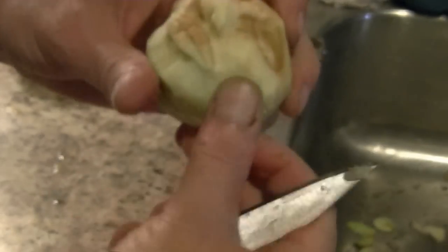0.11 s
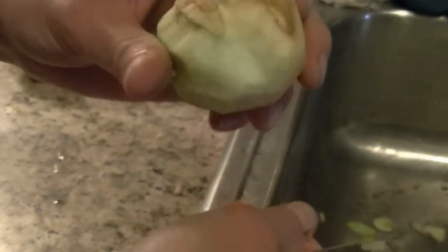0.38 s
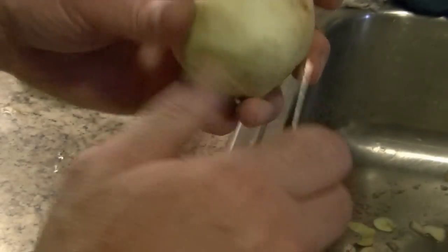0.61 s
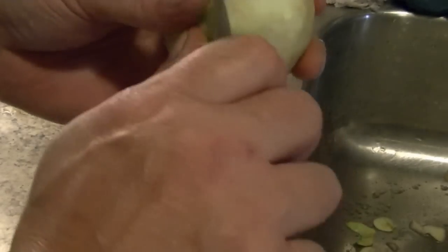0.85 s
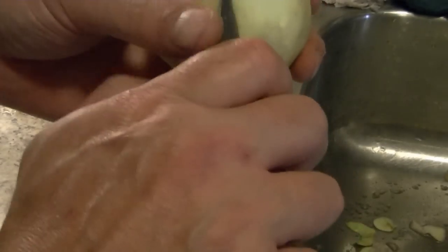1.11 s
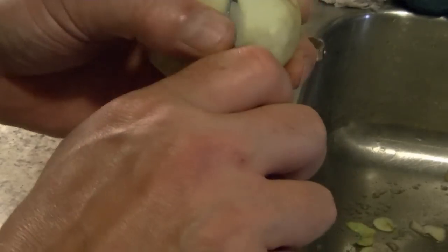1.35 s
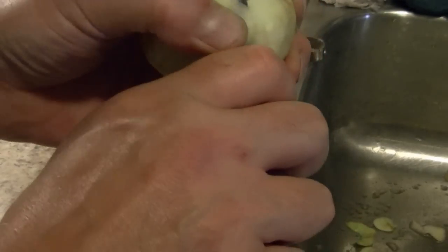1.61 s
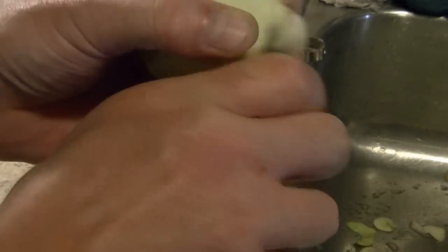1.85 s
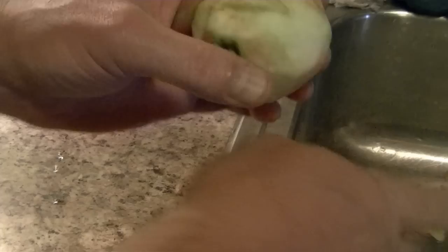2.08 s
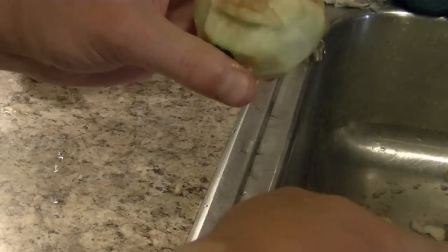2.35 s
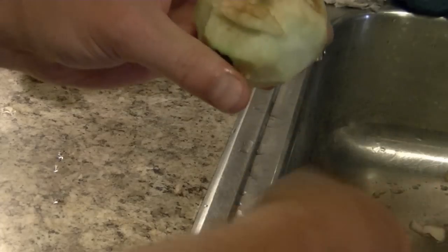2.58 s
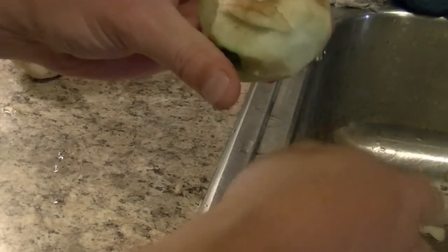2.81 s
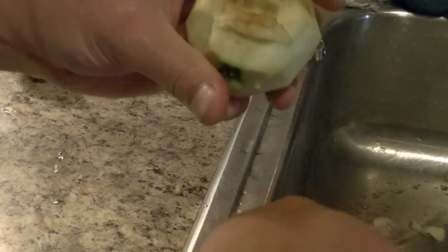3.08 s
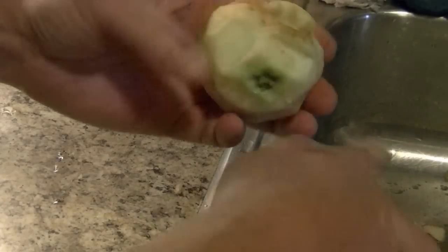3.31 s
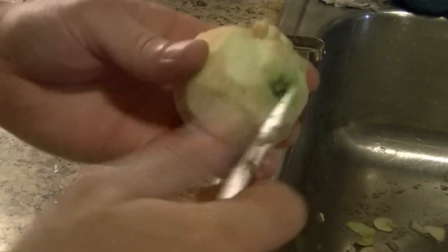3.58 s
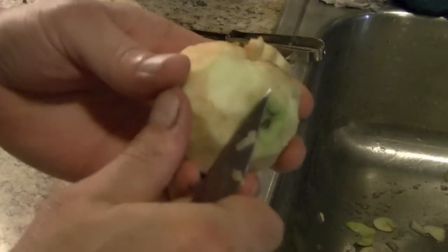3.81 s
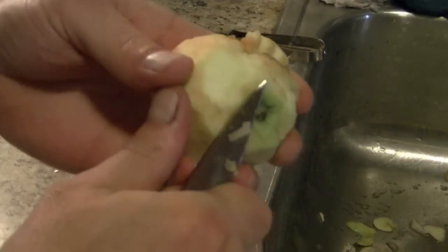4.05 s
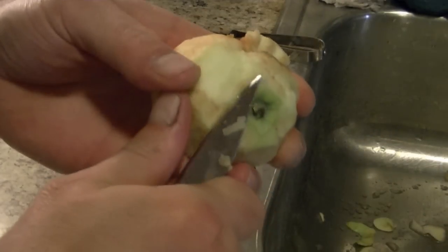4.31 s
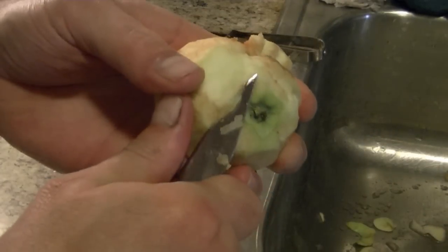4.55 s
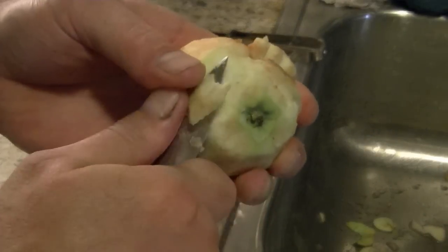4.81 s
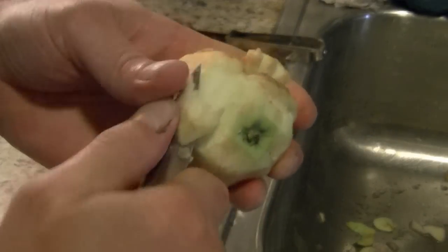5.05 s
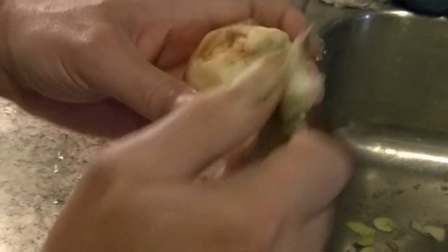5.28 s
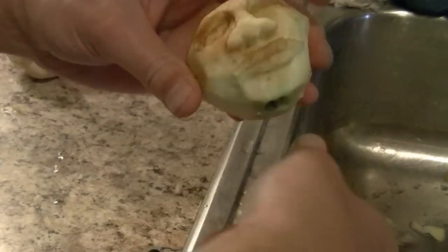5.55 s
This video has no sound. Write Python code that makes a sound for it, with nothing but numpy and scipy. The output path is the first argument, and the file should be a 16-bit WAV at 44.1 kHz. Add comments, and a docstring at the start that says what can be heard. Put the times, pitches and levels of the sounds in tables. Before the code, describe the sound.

A small knife cuts a wet peeled apple with crisp crackling crunches and one sharp snap, over a steady low kitchen hum.

```python
"""A small knife carves a peeled apple over a steel sink, close to a stereo camera in a humming kitchen.
From the start hum and microphone hiss (shaped noise) run on, fingers rub (patchy crackle), juice ticks (rung pushes).
Soon cells burst in swells of crackle that ring the fruit, and a wet squeak (narrow noise) slips by.
From about 1 s the blade rings too; at 2.7 s a scrap flicks off with a snap (damped tones) amid a soft hiss;
after 4 s come the hardest breaks, then rubbing and ticks to the end. The tiled room answers the hand sounds."""
import sys
import numpy as np
from scipy import signal
from scipy.fft import rfft, irfft
from scipy.io import wavfile
from scipy.ndimage import uniform_filter1d

SR = 44100
rng = np.random.default_rng(int(sys.argv[2]) if len(sys.argv) > 2 else 0)


def boost_factor(decibels):
    """Convert a level in decibels to a linear amplitude factor."""
    exponent = np.asarray(decibels, float) / 20
    return 10 ** exponent


def to_wav(s):
    """Save 16-bit WAV."""
    ch = np.atleast_2d(s).T  # columns
    pcm = np.round(np.clip(ch, -1, 1) * 32767)  # PCM
    wavfile.write(sys.argv[1], SR, pcm.astype(np.int16))


N = 249606  # length in samples

# Levels in the tables of hand sounds hold before the slight left-right balance in scene().

# colour of the appliance rumble and, in the treble, microphone hiss: (f/Hz, relative level per Hz/dB)
BACKGROUND_COLOUR = [(15, -60), (30, -64), (42, -56), (60, -26), (100, -15), (190, -9), (300, -9),
                     (480, -12), (800, -18), (1200, -20.5), (2400, -30), (4400, -37.5), (7000, -40),
                     (10600, -41.5), (13000, -51), (15000, -60)]
# narrow drones in the hum: (f/Hz, width/Hz, level before balance/dB)
HUM_DRONES = [(59.5, 2.5, -74.5), (149.6, 8.3, -65.5), (166, 14, -68), (189.2, 11.1, -53),
              (311.4, 25.5, -57), (408, 7.6, -61), (473.4, 9.9, -60.5), (670, 32, -64), (789, 3.6, -66.5),
              (955, 37, -63.5), (1322, 10, -70.5), (2826, 150, -70.5), (3850, 90, -76)]
# how alike the background is left and right: (f/Hz, likeness/share of 1, where below 0 counts as 0)
BACKGROUND_LIKENESS = [(30, -0.37), (60, 0.47), (130, 0.95), (290, 0.83), (630, 0.18), (1380, 0.11),
                       (3030, -0.79), (6640, -0.42), (14500, 0.16)]
# stretches of rubbing sound; the one from 2.626 s is only a soft, fading hiss around the snap:
# (start t/s, end t/s, hiss level at start/dB, hiss level at end/dB, fruit ring over hiss/dB)
RUB_STRETCHES = [(0, 0.21, -74, -72.5, 0), (0.24, 0.388, -61, -67, -4), (0.401, 0.42, -63, -63, -8),
                 (.5, 0.69, -82, -78, 0), (0.942, 1.012, -65.5, -65.5, 1), (1.084, 1.248, -64.5, -61, 1),
                 (1.287, 1.434, -55.5, -51.5, -3), (1.473, 1.656, -57, -53.5, -11),
                 (1.702, 1.814, -67, -60, -13), (1.87, 2.27, -64.5, -64.5, -4.5),
                 (2.343, 2.393, -65, -62, -22), (2.626, 2.8, -59, -78, 2.5), (2.92, 3.25, -65, -71, 2),
                 (3.283, 3.366, -66.5, -64, -6), (3.4, 3.488, -76, -66, -6),
                 (3.516, 3.687, -59, -59.5, -2.5), (3.757, 3.813, -69, -66.5, -13),
                 (3.937, 3.993, -63, -62.5, 5), (4.041, 4.237, -63.5, -61, 4.5),
                 (4.273, 4.393, -62.5, -60.5, 3), (4.415, 4.529, -52, -65, -2.5),
                 (4.58, 4.79, -61.5, -58, -2.5), (4.825, 4.935, -49, -56.5, -14),
                 (4.976, 5.164, -58.5, -60, -4.5), (5.2, 5.3, -64.5, -71, -4),
                 (5.336, 5.516, -69, -63.5, -3), (5.54, 5.608, -62, -59.5, -3)]
# blade pushed slowly through the fruit:
# (start t/s, end t/s, blade ring f/Hz, ring over rustle before its flutter/dB)
BLADE_IN_FLESH = [(1.09, 1.58, 3417, -3.5), (3.93, 4.3, 3270, -2.5)]
# colour of the rustle: (f/Hz, relative level per Hz/dB)
RUSTLE_COLOUR = [(600, -14), (1100, -5.5), (2300, -4.5), (3500, -2.5), (4500, -7.5), (5700, -7),
                 (6600, -15.5), (8000, -34)]
# colour of the wet hiss: (f/Hz, relative level per Hz/dB)
HISS_COLOUR = [(5600, -19.5), (6600, -5), (7700, -4), (10600, -1), (12700, -5.5), (14000, -13),
               (15000, -37)]
# juice ticks: (t/s, peak level/dB, centre f/Hz, width of the first resonance/share of centre)
JUICE_TICKS = [(0.043, -49, 10500, .5), (0.3293, -38, 9900, 0.8), (1.5993, -33, 10600, 0.68),
               (1.8677, -41, 10100, 0.68), (2.274, -38.5, 8770, 0.57), (2.8534, -46, 9900, 0.32),
               (4.3216, -39, 1890, 1.2), (4.8569, -16.5, 9090, 0.32), (5.2912, -42, 10400, 0.74),
               (5.419, -47, 11000, .4), (5.5517, -35, 9150, 0.67)]
# bursts of fruit cells breaking under blade or fingers:
# (peak t/s, wet hiss level/dB, fruit ring over hiss/dB, fruit ring f/Hz, fall/ms)
BREAKS = [(0.257, -57, 7, 1630, 16), (0.2804, -53.5, 3.5, 1720, 9.4), (0.291, -54, 2.5, 1900, 12),
          (1.191, -55, 6, 1540, 6.1), (1.2312, -55.5, 3, 1590, 6.9), (1.319, -59, 9, 1570, 14),
          (1.3569, -56.5, 6, 1660, 22), (1.3883, -45.5, 8, 1650, 11.6), (1.413, -51.5, 7, 1510, 16),
          (1.5583, -47.5, 4, 1580, 8.5), (1.6038, -40.5, 3.5, 1530, 5.1), (1.7321, -59, -12, 1510, 13),
          (1.751, -39, -4.5, 1580, 22.6), (1.778, -48.5, 5, 1490, 7.4), (4.3234, -52.5, 12.5, 1480, 4),
          (4.402, -63, 16, 1440, 9), (4.4426, -36, 4.5, 1830, 7.1), (4.681, -36, 6.5, 1750, 7),
          (4.6933, -45.5, -6, 1780, 8.1), (4.711, -34.5, 1, 1610, 7.6), (4.845, -46, -17, 1650, 15),
          (4.859, -35, -4.5, 1710, 15.4), (4.884, -38, -7, 1600, 9.3), (4.904, -49, -16, 1730, 9.5),
          (5.0016, -54, 1, 1510, 13), (5.0327, -38.5, -10.5, 1490, 19.5), (5.071, -40, -1.5, 1650, 6.4),
          (5.098, -48, -12, 1550, 20)]
# one brief narrow squeak: (level/dB, f/Hz, width/Hz, half length/ms)
WET_SQUEAK = (-55, 3980., 280., 7)
# tones of the flicked scrap: (f/Hz, relative level before filtering/dB, time to fall by 60 dB/s)
SNAP_MODES = [(964, -31, 0.044), (1650, -43, 0.0044), (2640, -5.5, 0.0033), (3500, 2, 0.0023),
              (4800, -2, 0.0016), (6400, -8, 0.0012), (8140, -1.5, 0.0016)]


def on_log_hz(table, hz):
    """Read (Hz, value) points on a log-frequency axis."""
    point_hz, value = np.transpose(table)
    return np.interp(np.log(np.maximum(hz, 1)), np.log(point_hz), value)


def unit(x):
    """Scale to rms 1."""
    return x / np.sqrt(np.mean(x ** 2))


def colour(x, table):
    """Filter x by a curve of (Hz, dB) points, then bring it to rms 1."""
    gain = boost_factor(on_log_hz(table, np.fft.rfftfreq(N, 1 / SR)))
    return unit(irfft(rfft(x) * gain, N))


def ring(x, hz, width_hz):
    """Two-pole resonance, gain 1 at the centre."""
    return signal.lfilter(*signal.iirpeak(hz, hz / width_hz, fs=SR), x)


def fruit(force, hz, width_hz):
    """A steep resonance that roughly keeps the power of white crackle; serves fruit, blade and squeak."""
    rung = ring(ring(force, hz, width_hz), hz, 2 * width_hz)
    return rung * np.sqrt(SR / (2 * width_hz))


def walk(rate):
    """Random levels, each held for 1 / rate seconds, then smoothed twice."""
    hold = int(SR / rate)
    steps = np.repeat(rng.standard_normal(N // hold + 1), hold)
    return 1.44 * uniform_filter1d(uniform_filter1d(steps, hold), hold)[:N]


def cells(spread_db, patchy_db, patch_rate, side_db):
    """Dense bursting cells in three voices, spread over the fruit so the two ears differ in part."""
    size = boost_factor(spread_db * rng.exponential(size=N) + patchy_db * walk(patch_rate))
    mid, side = rng.standard_normal((2, 3, 1, N)) * size
    force, rustle, hiss = mid + boost_factor(side_db) * side * np.array([[1], [-1]])
    return unit(force), colour(rustle, RUSTLE_COLOUR), colour(hiss, HISS_COLOUR)


def pair_noise(alike):
    """Spectra of two noises, alike left and right by the given share at each frequency."""
    mid, side = rfft(rng.standard_normal((2, N)))
    alike = np.clip(alike, 0, 0.99)
    shared = np.sqrt((1 + alike) / 2) * mid
    opposed = np.sqrt((1 - alike) / 2) * side
    return shared + opposed * np.array([[1], [-1]])


def hum():
    """Steady appliance rumble with narrow drones, plus microphone hiss in the treble, mostly unrelated
    left and right."""
    broad_db = -51  # before the balance below
    hz = np.fft.rfftfreq(N, 1 / SR)
    alike = on_log_hz(BACKGROUND_LIKENESS, hz)
    broad = boost_factor(broad_db) * unit(irfft(pair_noise(alike) * boost_factor(on_log_hz(BACKGROUND_COLOUR, hz)), N))
    drone_power = np.zeros(len(hz))  # per Hz
    for centre_hz, width_hz, db in HUM_DRONES:
        half_hz = width_hz / 2
        drone_power += boost_factor(db) ** 2 / (np.pi * half_hz) / (1 + ((hz - centre_hz) / half_hz) ** 2)
    drones = irfft(pair_noise(alike) * np.sqrt(drone_power * SR / 2), N)
    return (broad + drones) * boost_factor(np.array([[-0.8], [0.8]]))  # a little louder on the right


def rub():
    """Patchy crackle of sliding contact, and a soft hiss around the snap; the blade sings in the flesh."""
    grow_s, fade_s = 0.013, 0.018  # each stretch grows and fades this quickly
    rustle_db, rustle_follow = 0.5, 0.16  # rustle over hiss, plus a share of the fruit ring's dB
    now = np.arange(N) / SR
    press = np.zeros((3, N))  # hiss, fruit ring, rustle
    for start, end, db_start, db_end, ring_db in RUB_STRETCHES:
        before = np.clip((start - now) / grow_s, 0, 30)
        after = np.clip((now - end) / fade_s, 0, 30)
        stretch = np.exp(-before - after) * boost_factor(np.interp(now, [start, end], [db_start, db_end]))
        press += stretch * boost_factor(np.array([[0], [ring_db], [rustle_db + rustle_follow * ring_db]]))
    force, rustle, hiss = cells(1.9, 1.45, 90, -1.5)
    blade = np.zeros((2, N))
    for start, end, hz, db in BLADE_IN_FLESH:
        inside = (now > start) * (now < end)
        blade += boost_factor(db) * fruit(force * inside, hz, 145)
    blade *= boost_factor(3.3 * walk(24.85))  # its level flutters
    return press[0] * hiss + press[1] * fruit(force, 1620, 600) + press[2] * (rustle + blade)


def ticks():
    """Juice ticks: a sudden push through a wide resonance, mostly in the treble."""
    out = np.zeros(N)
    push = np.r_[-1.0, 1.0, np.zeros(SR // 100)]
    for s, db, hz, share in JUICE_TICKS:
        click = ring(ring(push, hz, hz * share), hz, 0.4 * hz)
        out[int(s * SR):][:len(click)] += boost_factor(db) * click / np.abs(click).max()
    return out


def crunch():
    """Each break is a swell of crackle; its ring pitch depends on where the fruit is held."""
    carving_start_s, carving_end_s = 1.1, 4.9  # breaks outside this span come from fingers alone
    rise_ms, rise_per_fall = 2.45, 0.37  # a break that dies slowly also swells slowly
    blade_db, rustle_db, follow = -10, -1.55, 0.32  # over hiss, plus a share of the fruit ring's dB
    out = np.zeros((2, N))
    force, rustle, hiss = cells(1.5, 1.4, 250, -5.5)
    for s, db, ring_db, hz, fall_ms in BREAKS:
        burst = slice(int(s * SR) - SR // 10, int(s * SR) + SR // 5)
        ms = (np.arange(N)[burst] / SR - s) * 1000  # time from the peak
        rise = ms / (rise_ms + rise_per_fall * fall_ms)
        swell = boost_factor(db) * np.exp(np.where(ms < 0, rise, -ms / fall_ms))
        push = force[:, burst] * swell
        out[:, burst] += hiss[:, burst] * swell
        out[:, burst] += boost_factor(ring_db) * fruit(push, hz, 260)
        out[:, burst] += boost_factor(rustle_db + follow * ring_db) * rustle[:, burst] * swell
        if carving_start_s < s < carving_end_s:
            out[:, burst] += boost_factor(blade_db + follow * ring_db) * fruit(push, 3380, 202.5)
    return out


def squeak():
    """A wet surface slips for an instant and whistles."""
    peak_s = 0.412
    db, hz, width_hz, half_ms = WET_SQUEAK
    slip = np.exp(-((np.arange(N) / SR - peak_s) * 1000 / half_ms) ** 2)
    return boost_factor(db) * fruit(rng.standard_normal(N) * slip, hz, width_hz)


def snap():
    """A scrap flicked off the blade: a sharp blow rings a few damped modes; so small a body has little bass."""
    start_s, peak_db = 2.6608, -9
    out = np.zeros(N)
    s = np.arange(SR // 10) / SR
    blow = np.zeros(len(s))
    for hz, db, t60_s in SNAP_MODES:
        blow += boost_factor(db) * np.sin(2 * np.pi * hz * s) * np.exp(-np.log(1000) * s / t60_s)
    blow = -signal.sosfilt(signal.ellip(8, 0.5, 60, 10400, fs=SR, output="sos"), blow)  # cut the top
    blow = signal.lfilter(*signal.butter(2, 800, "high", fs=SR), blow)  # thin the bass
    out[int(start_s * SR):][:len(s)] = boost_factor(peak_db) * blow / np.abs(blow).max()
    return out


def kitchen(x):
    """Near surfaces and a short tiled-room tail, different in each ear."""
    t60_s, early_s, early_db = 0.17, 0.0012, 1.7  # tail; fall time of near echoes; their level over the tail
    room_db, onset_s = -7.5, 0.00037
    s = np.arange(SR // 2) / SR
    shape = np.exp(-np.log(1000) * s / t60_s) + boost_factor(early_db) * np.exp(-s / early_s)
    shape *= np.clip(s / onset_s, 0, 1)
    tail = rng.standard_normal((2, len(s))) * shape
    tail = signal.lfilter([1], [1, -0.2], tail)  # slightly duller
    tail /= np.sqrt(np.sum(tail ** 2) / 2)
    return boost_factor(room_db) * signal.fftconvolve(x[None], tail, axes=1)[:, :N]


def scene():
    """Hands and fruit near the middle, heard direct and by way of the room, over hum and microphone hiss."""
    hands = rub() + crunch()
    clicks = ticks() + squeak() + snap()
    room = kitchen(clicks + boost_factor(1.5) * hands.mean(axis=0))
    direct = (hands + clicks) * boost_factor(np.array([[-0.3], [0.3]]))
    return direct + room + hum()


def top_cut(x):
    """Nothing passes above the cut-off."""
    return signal.sosfilt(signal.butter(12, 15140, fs=SR, output="sos"), x)


def record(dry):
    """The camera cuts the top of the treble steeply."""
    mix = signal.sosfilt(signal.ellip(8, 0.2, 70, 14700, fs=SR, output="sos"), dry)
    return top_cut(mix)


dry = scene()
out = record(dry)
to_wav(out)
```